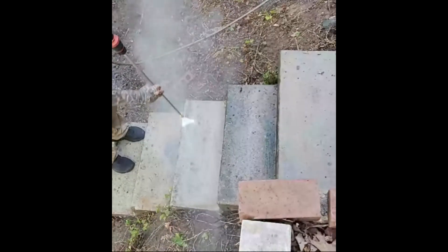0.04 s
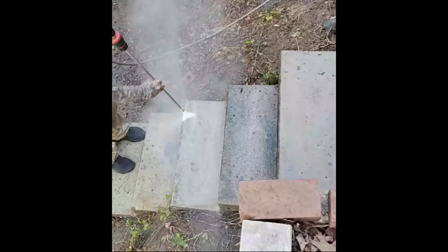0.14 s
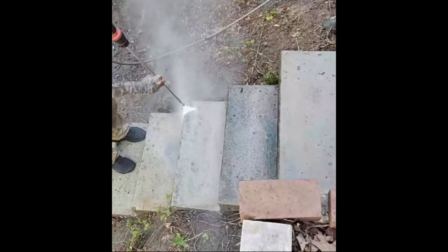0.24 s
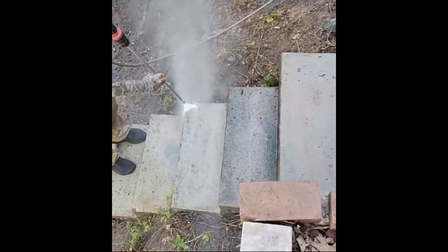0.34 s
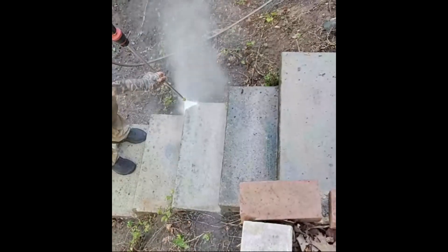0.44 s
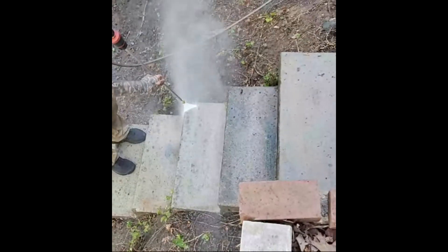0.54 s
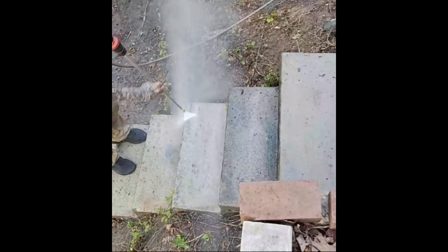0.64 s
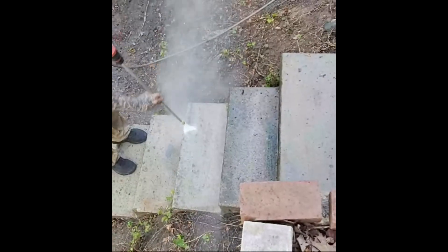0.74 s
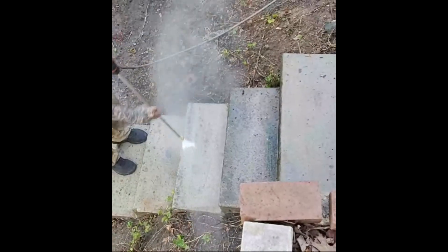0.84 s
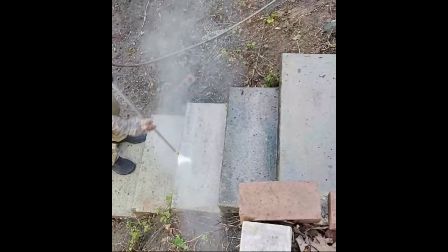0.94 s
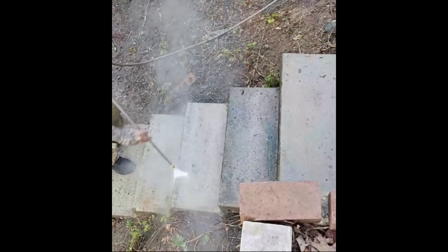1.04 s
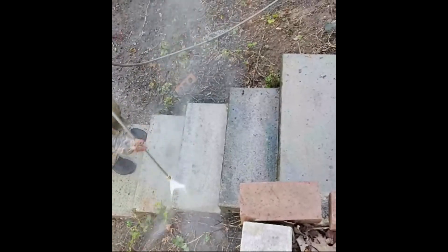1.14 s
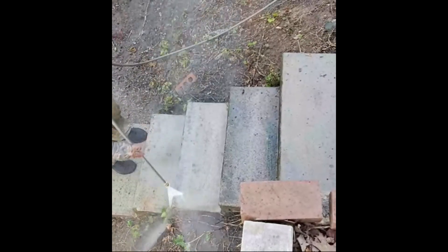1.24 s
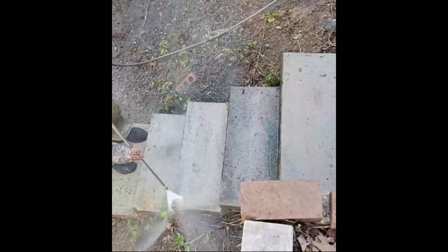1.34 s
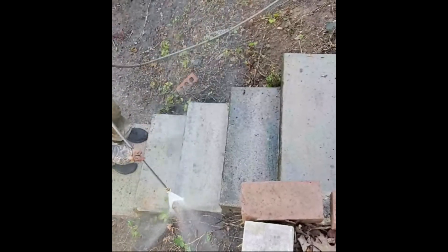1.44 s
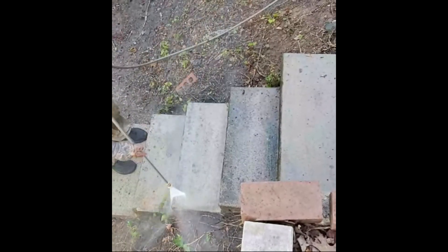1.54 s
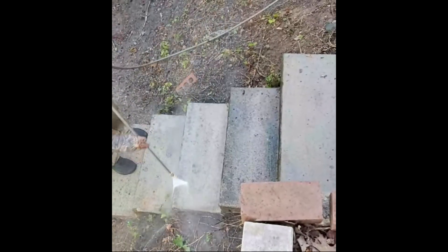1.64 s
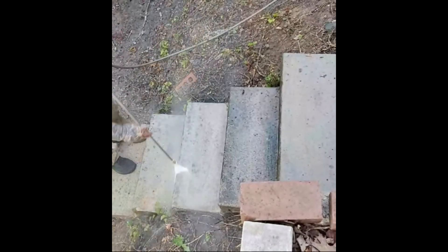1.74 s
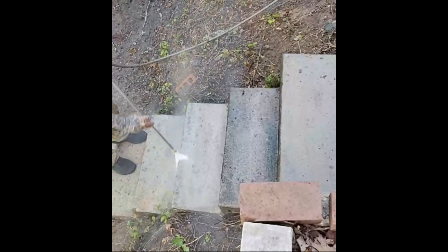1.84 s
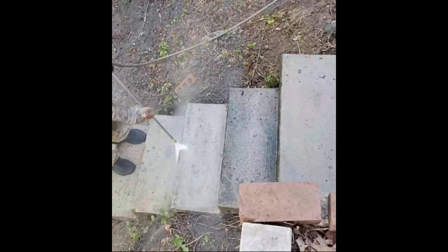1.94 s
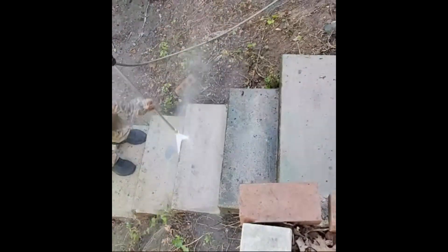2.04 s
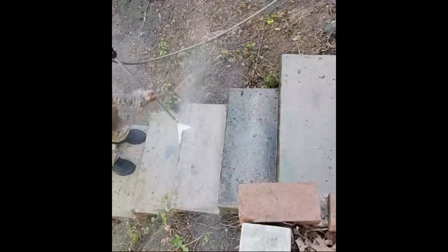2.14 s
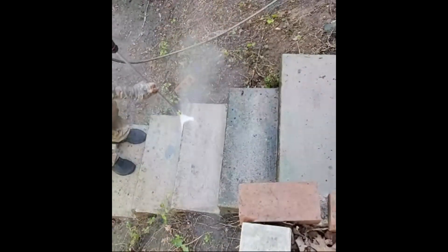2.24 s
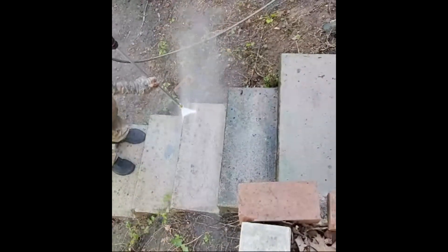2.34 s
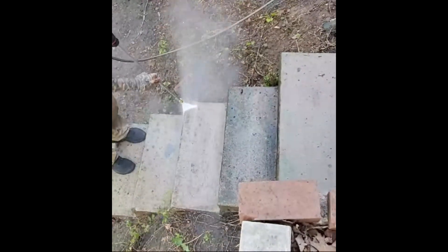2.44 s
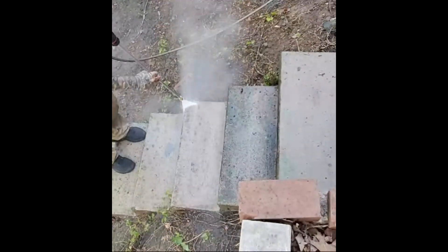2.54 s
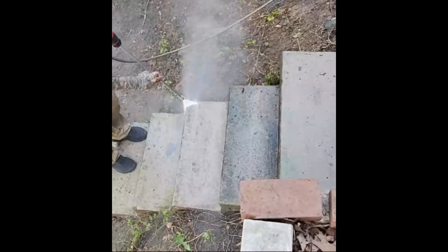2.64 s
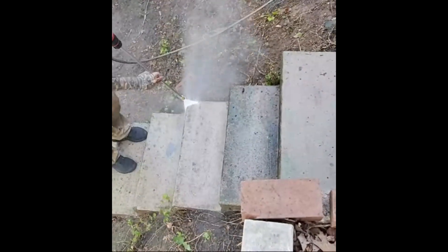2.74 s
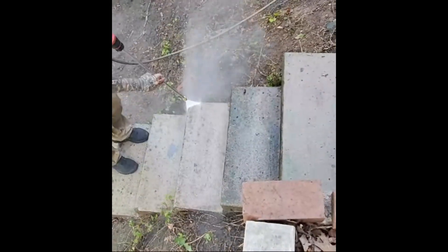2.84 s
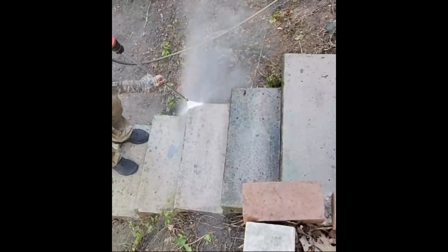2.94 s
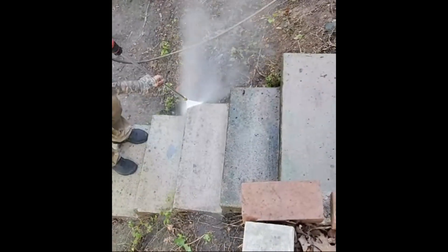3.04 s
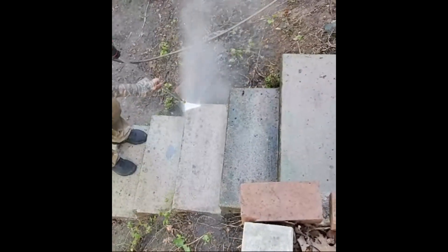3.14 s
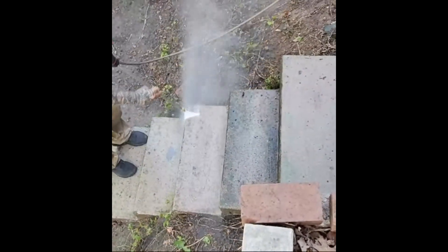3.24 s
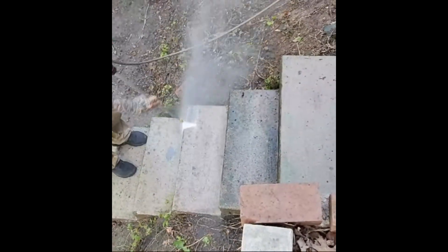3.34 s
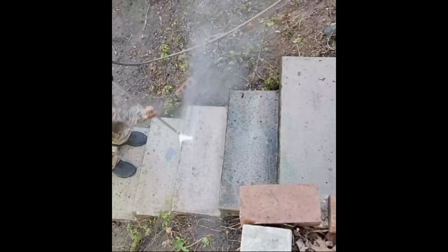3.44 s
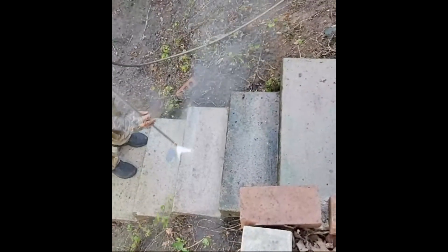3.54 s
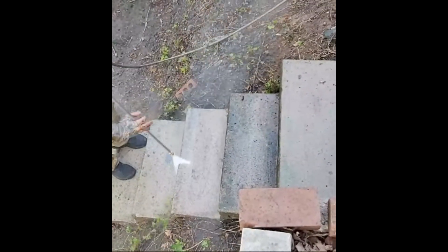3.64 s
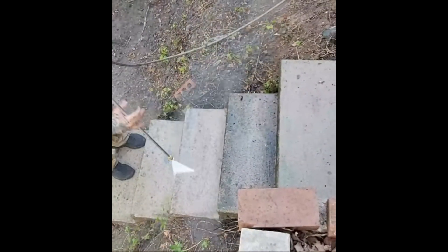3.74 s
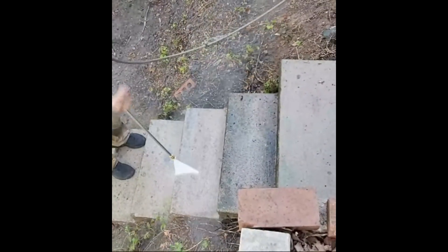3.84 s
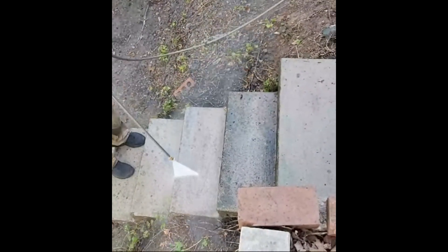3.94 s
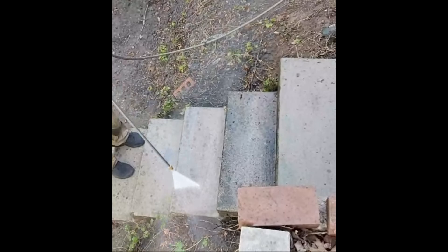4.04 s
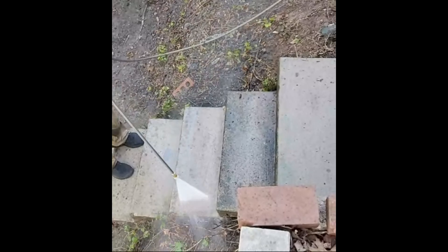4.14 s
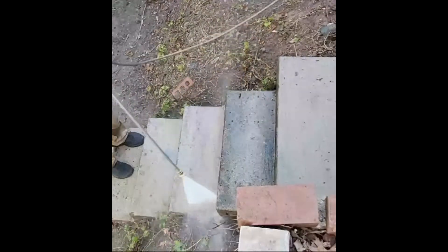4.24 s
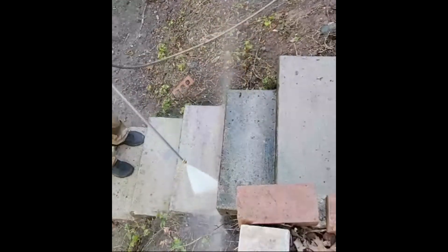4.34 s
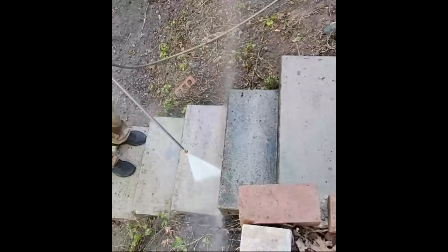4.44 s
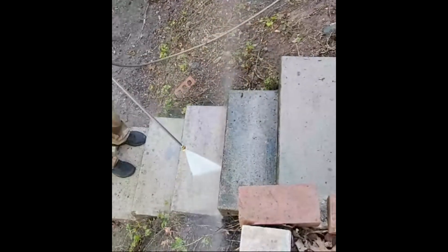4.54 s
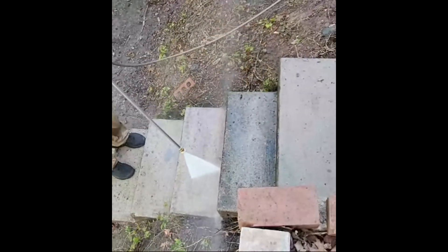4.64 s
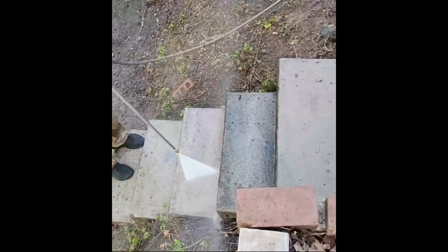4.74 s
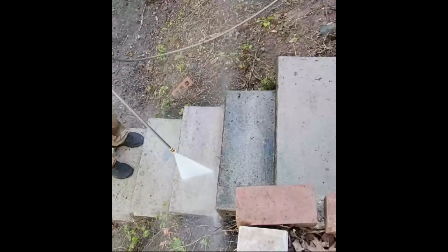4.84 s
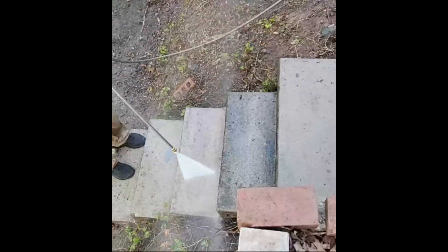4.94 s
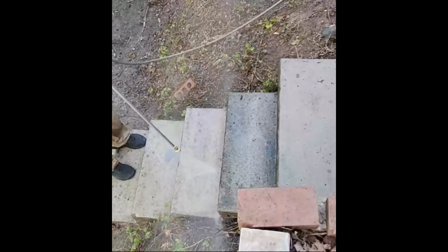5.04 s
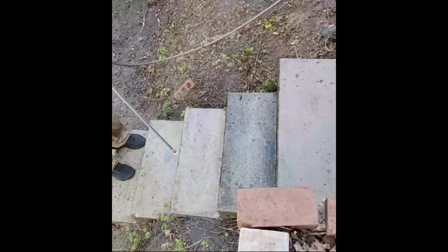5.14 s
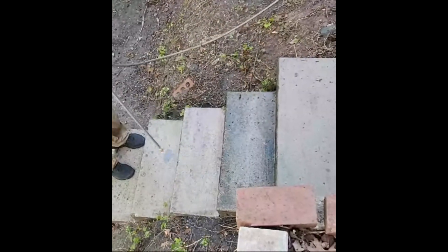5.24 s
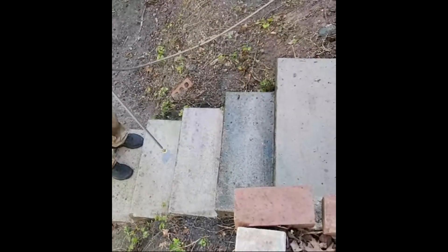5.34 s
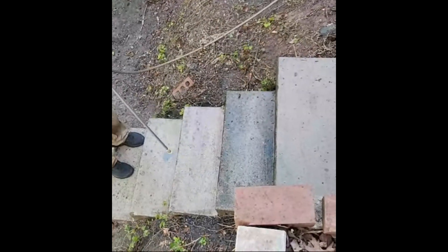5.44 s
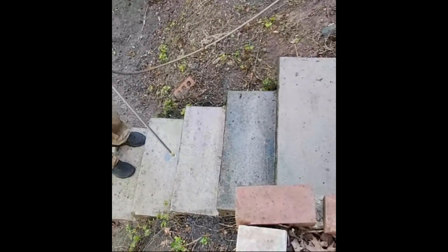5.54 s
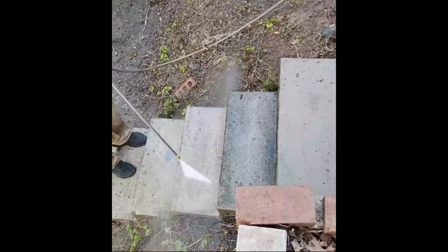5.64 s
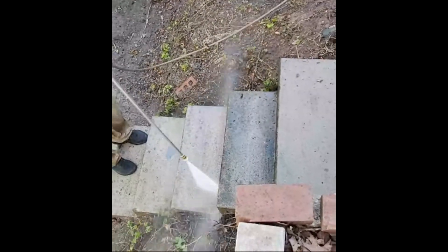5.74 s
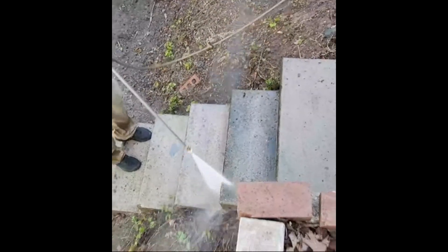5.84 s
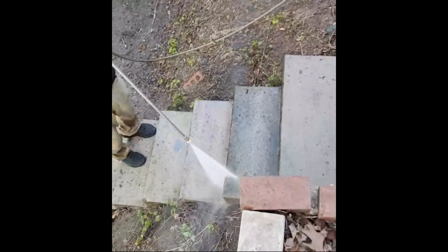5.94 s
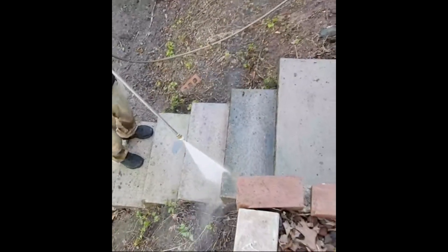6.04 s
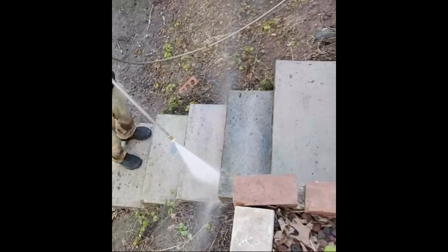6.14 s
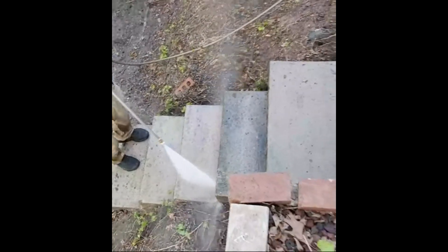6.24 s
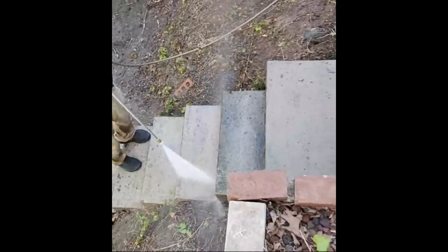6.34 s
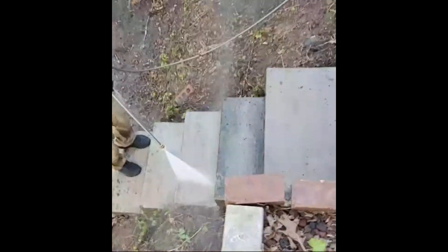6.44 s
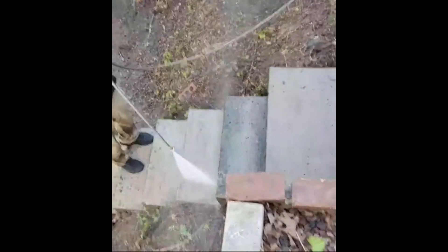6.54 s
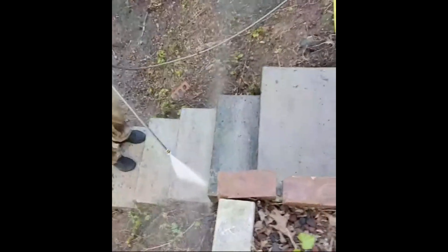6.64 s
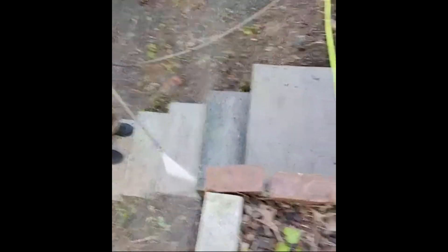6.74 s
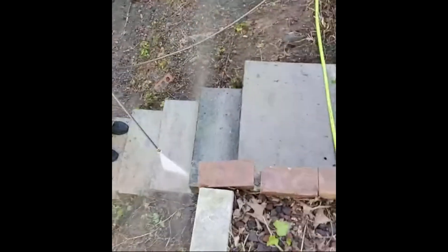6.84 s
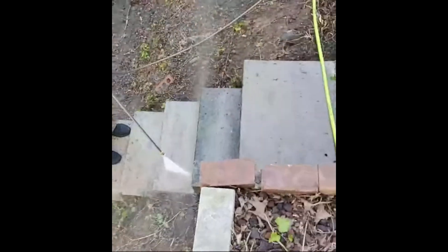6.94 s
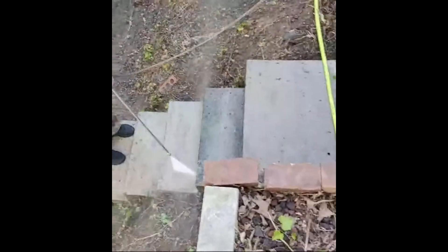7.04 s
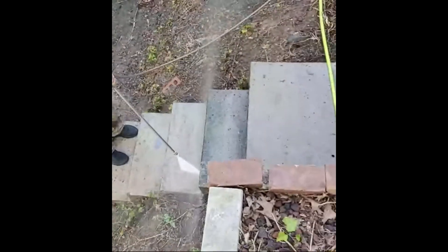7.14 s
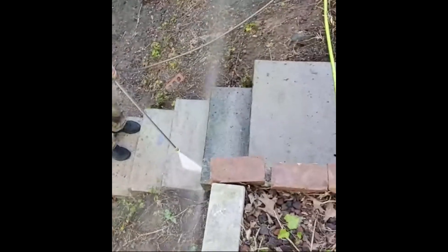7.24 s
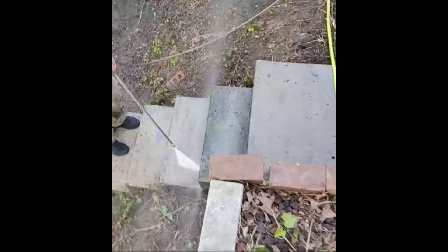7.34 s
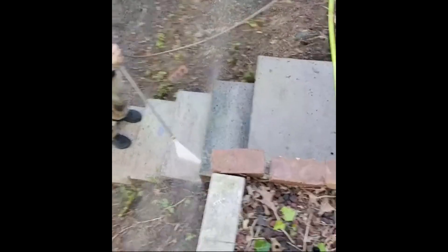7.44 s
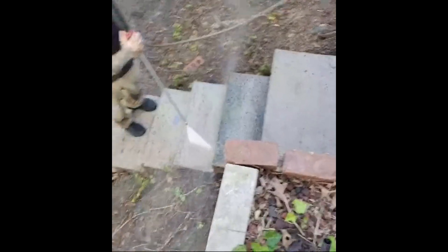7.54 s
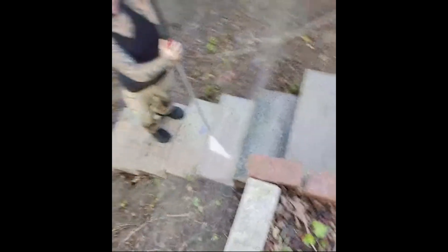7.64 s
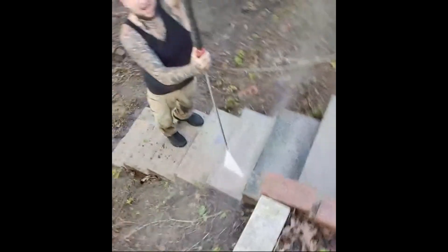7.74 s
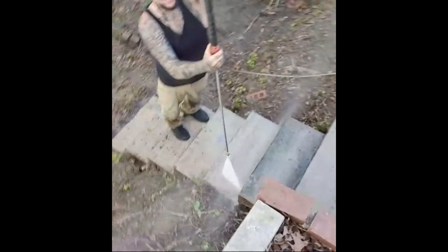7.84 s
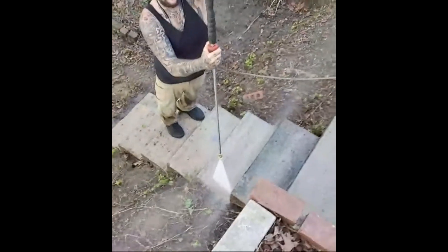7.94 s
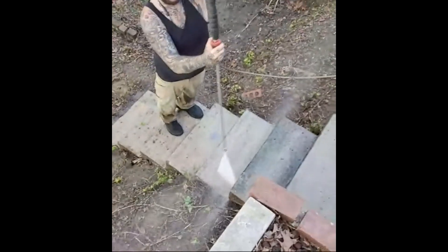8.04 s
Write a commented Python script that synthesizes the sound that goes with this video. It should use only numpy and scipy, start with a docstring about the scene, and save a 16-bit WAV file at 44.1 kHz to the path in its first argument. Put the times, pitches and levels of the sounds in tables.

```python
"""A pressure washer's jet sweeps concrete steps, hissing steadily and flaring on edges and corners.
Its one-cylinder petrol engine drones and clatters some way off. The trigger is let go for half a
second: the hiss drops and the unloaded engine races. Then the jet slams back into the corner of a
step, where the water slaps, gushes and churns. Thin high bands of noise flicker in this loud passage,
and a rough low hum sounds under the jet at first and later around the engine's drone."""
import sys
import numpy as np
from scipy import signal
from scipy.fft import rfft, irfft, next_fast_len
from scipy.io import wavfile
from scipy.ndimage import uniform_filter1d, map_coordinates

SR = 44100
rng = np.random.default_rng(int(sys.argv[2]) if len(sys.argv) > 2 else 0)


def to_wav(sig):
    """Store sig (one row per channel, or 1-D mono) as 16-bit WAV at the path in sys.argv[1].

    Samples outside -1..1 are clipped; the rate is SR.
    """
    pcm = np.clip(np.atleast_2d(sig), -1, 1) * 32767
    pcm = np.round(pcm).astype(np.int16)
    wavfile.write(sys.argv[1], SR, pcm.T)  # frames by channels


N = 356328
TIME_S = np.arange(N) / SR
TRIGGER_OFF_S, TRIGGER_ON_S, LOUD_ENDS_S = 5.06, 5.587, 6.74


def amp(db):
    return 10 ** (np.asarray(db) / 20)

def unit(x):
    return x / np.sqrt(np.mean(x ** 2) + 1e-20)

def mix_db(*levels_db):
    """Levels added as powers."""
    return 10 * np.log10(sum(amp(db) ** 2 for db in levels_db))

def eq(points, hz):
    """Gain of an EQ curve drawn through (freq_hz, gain_db) points on a log axis."""
    freq_hz, gain_db = np.transpose(points)
    return amp(np.interp(np.log(hz + 1), np.log(freq_hz + 1), gain_db))

def hump(hz, centre_hz, octaves, steep):
    """A band that falls to 1/e at `octaves` either side of its centre."""
    return np.exp(-np.abs(np.log2((hz + 1) / centre_hz) / np.clip(octaves, .008, 3)) ** steep)

def curves(rows):
    """Automation: one value per sample for each column after the time."""
    time_s, *columns = np.transpose(rows)
    return [np.interp(TIME_S, time_s, column) for column in columns]

def bursts(tables, edge_s=0.022):
    """Joins tables into one automation, faded to silence between them."""
    rows = []
    for table in tables:
        first, last = table[0], table[-1]
        rows += [(first[0] - edge_s, -100, *first[2:]), *table, (last[0] + edge_s, -100, *last[2:])]
    return curves(rows)

def swell(peak_s, length_ms):
    """A bell-shaped rise and fall."""
    return np.exp(-(2000 * (TIME_S - peak_s) / length_ms) ** 2)

def wobble(rate):
    """A smooth random curve, `rate` knots a second."""
    return map_coordinates(rng.standard_normal(int(N * rate / SR) + 4), [np.arange(N) * rate / SR])

def filtered(x, response):
    """x through a filter with gain response(hz)."""
    size = next_fast_len(N + 8192)
    return irfft(rfft(x, size) * response(np.fft.rfftfreq(size, 1 / SR)), size)[:N]

def rush(shape, patchy_db, grain_db, grain_rate):
    """Noise of rms 1, coloured by shape(hz, sample index), with random patches and a fast grain."""
    grain = amp(grain_db * wobble(grain_rate))
    hz, frame_s, spectra = signal.stft(grain * rng.standard_normal(N), SR, nperseg=512)
    field = uniform_filter1d(rng.standard_normal(spectra.shape), size=5, axis=0)
    field = unit(uniform_filter1d(field, size=7, axis=1))
    at = np.minimum(frame_s * SR, N - 1).astype(int)
    colour = shape(hz[:, None], at) * np.ones(spectra.shape)
    colour /= np.sqrt(np.mean(colour ** 2, axis=0))
    patches = amp((patchy_db * np.ones(N))[at] * field)
    return unit(signal.istft(spectra * colour * patches, SR, nperseg=512)[1][:N])


def firing_rate(free_s, loaded_s, unloaded):
    """Firings a second: the engine races and settles off load, then bogs briefly as the load returns."""
    governed_hz, race_hz, bog_hz = 28.36, 3.6, .9
    run_up_s, settle_hz_per_s, recover_s = .15, 8.5, .25
    race = race_hz * np.sin(np.pi / 2 * np.minimum(free_s / run_up_s, 1)) ** 2
    settle = settle_hz_per_s * np.clip(free_s - run_up_s, 0, 1)
    bog = bog_hz * np.exp(-loaded_s / recover_s)
    return governed_hz + unloaded * (race - settle) - (1 - unloaded) * bog

# Engine fader, with a lift of the orders near 388 Hz: time_s, level_db, lift_db
ENGINE_FADER = [(0, -44, -9), (3.3, -42, -9.5), (5.1, -43.5, -2), (5.56, -44.5, -1.5), (5.7, -56, 5),
                (6.2, -54, 3), (6.8, -50.5, 9.5), (7.4, -50.5, 11), (8.08, -48.5, 8.5)]
# Exhaust harmonics: multiple_of_firing_rate, level_db
EXHAUST_ORDERS = [(1, -35), (2, -20.5), (3, -22), (4, -10.5), (5, -3), (6, -6), (7, 4), (8, 3.5), (9, -4),
                  (10, -11.5), (11, -7), (12, 1.5), (13, -9), (14, -29.5), (15, -31.5), (16, -5.5),
                  (17, -13.5), (18, -17.5), (19, -6.5), (20, -6.5), (21, -12.5)]
# Tone of the casing's clatter: freq_hz, gain_db
CLATTER_EQ = [(15, -52.5), (25, -30), (91, -19.5), (120, -9.5), (223, -12.5), (279, -14), (308, -12),
              (493, -28), (617, -16), (811, -26.5), (2610, -37), (8390, -51.5), (9500, -54.5),
              (12400, -93.5), (20900, -120)]

def engine():
    """One cylinder's wavering exhaust orders over clatter; unloaded, it swells and thins out."""
    lag_s, thins_s, lift_hz = .08, .25, 388
    free_s = np.clip(TIME_S - TRIGGER_OFF_S - lag_s, 0, None)
    loaded_s = np.clip(TIME_S - TRIGGER_ON_S, 0, None)
    unloaded = np.exp(-(loaded_s / .05) ** 2)  # falls to 0 as the load returns
    rate = firing_rate(free_s, loaded_s, unloaded)
    free = unloaded * np.tanh(free_s / thins_s)
    level_db, lift_db = curves(ENGINE_FADER)
    slope_db = -1.5 - 13 * free  # per octave either side of the fourth order
    hunting_hz = 0.049 + 0.18 * np.abs(rate - rate[0])  # uneven off its governed speed
    phase = 2 * np.pi * np.cumsum(rate + hunting_hz * wobble(10)) / SR
    exhaust = np.zeros(N)
    for order, db in EXHAUST_ORDERS:
        colour_db = slope_db * abs(np.log2(order / 4)) + lift_db * hump(order * rate[0], lift_hz, .13, 2)
        smear = np.pi / 4 * order ** 2  # the silencer smears each firing into four even puffs
        exhaust += amp(db + colour_db + 0.91 * wobble(5)) * np.sin(order * phase - smear)
    clatter = rush(lambda hz, i: eq(CLATTER_EQ, hz), patchy_db=-1.5, grain_db=-1.0, grain_rate=120)
    clatter_db = -8 + 0.44 * slope_db - 0.16 * lift_db
    return amp(level_db + 6 * free) * (unit(exhaust) + amp(clatter_db) * clatter)


def loud_passage():
    """1 during the loud passage after the jet restarts, otherwise 0."""
    return 1. * (TIME_S > TRIGGER_ON_S) * (TIME_S < LOUD_ENDS_S)

def trigger_db():
    """The valve shuts and ducks the hiss to a fading drip."""
    travel_s, drip_db, fade_db_per_s = 0.042, -13, -8
    closing = np.clip((TIME_S - TRIGGER_OFF_S) / travel_s + .5, 0, 1)
    opening = np.clip((TRIGGER_ON_S - TIME_S) / travel_s + .5, 0, 1)
    return closing * opening * (drip_db + fade_db_per_s * (TIME_S - TRIGGER_OFF_S))

# Sputters in the fan of water: centre_s, depth_db, length_ms
FAN_SPUTTERS = [(4.2, -5, 60), (4.936, -5.5, 33), (5.632, 0, 16), (5.8, -2.5, 27), (5.86, -3.5, 19),
                (5.93, -3.5, 23), (5.77, -2.5, 23), (6.03, -18, 46), (6.16, -5, 32), (6.215, -3.5, 24),
                (6.279, -16.5, 39), (6.385, -8, 38), (6.505, -10, 61), (6.775, -3.5, 50), (7.36, -4, 43)]

def breakup_db():
    """The level dips as the fan breaks up for an instant; each layer scales the dips to suit."""
    return sum(db * swell(s, ms) for s, db, ms in FAN_SPUTTERS)


# Thin high bands of noise: centre_hz, half_width_oct, level_db
HIGH_BANDS = [(6550, .06, -44), (8600, 0.01, -50.5)]

def high_bands():
    """Thin, flickering high bands of noise in the loud passage."""
    out = np.zeros(N)
    for centre_hz, octaves, db in HIGH_BANDS:
        flicker = amp(db - 5.7 * np.abs(wobble(14)))
        band = rush(lambda hz, i: hump(hz, centre_hz, octaves, 2),
                    patchy_db=.8, grain_db=1.0, grain_rate=100)
        out += flicker * band
    return loud_passage() * amp(.3 * breakup_db()) * out


# Stretches of rough low hum: start_s, length_s, level_db, level_change_db, pitch_hz
LOW_HUMS = [(5.844, 0.31, -32.5, -2, 352), (6.239, .46, -35.5, -3, 352), (6.763, 0.036, -41, -1, 459),
            (7.0, 1.04, -55, 9.5, 375)]

def low_hum():
    """A rough low hum, under the jet at first and later around the engine's drone."""
    ramp_s = .04
    notes = [[(s - ramp_s, db - 20, hz), (s, db, hz),
              (s + length, db + change, hz), (s + length + ramp_s, db + change - 20, hz)]
             for s, length, db, change, hz in LOW_HUMS]
    level_db, pitch_hz = bursts(notes, edge_s=.002)
    phase = 2 * np.pi * np.cumsum(pitch_hz) / SR
    tone = unit((0.6 + wobble(90)) * np.cos(phase) + wobble(90) * np.sin(phase))
    return amp(level_db + .3 * breakup_db()) * tone


# Colour of the corner, on churn and gushes alike: freq_hz, gain_db
CORNER_EQ = [(200, -4), (400, 0), (570, 2), (800, -4.5), (1100, -1), (1600, -1), (2500, 8)]
# Fader of the churning water: time_s, level_db
CHURN_FADER = [(5.59, -20.5), (5.665, -38), (5.72, -20.5), (5.9, -25), (6.0, -29), (6.2, -36),
               (6.38, -33.5), (6.452, -29.5), (6.5, -33), (6.8, -55), (7.3, -57), (8.08, -50)]

def churn():
    """Thrown-back water churns in the angle of the step."""
    backsplash_db = bursts(FLARE_PASSES)[0] - 23  # every flare throws back a little water
    level_db = mix_db(bursts([CHURN_FADER])[0], backsplash_db)
    water = rush(lambda hz, i: hump(hz, 888, 1.0, 1.95) * eq(CORNER_EQ, hz),
                 patchy_db=3.0, grain_db=1.5, grain_rate=140)
    return amp(level_db + 0.13 * breakup_db() + 0.51 * wobble(30)) * water


# Gushes and splashes: peak_s, level_db, centre_hz, half_width_oct, length_ms
GUSH_CUES = [(0.861, -29, 2950, 0.059, 170), (.92, -31.5, 3960, 0.06, 220), (1.03, -36, 5360, 0.052, 110),
             (1.115, -24.5, 1290, .9, 105), (1.455, -30, 1560, 0.74, 53), (1.798, -24, 2580, 0.089, 37),
             (3.362, -31, 2370, 0.26, 50), (4.152, -33, 1190, 0.88, 59), (5.594, -20.5, 890, 0.38, 9.6),
             (5.612, -18.5, 760, 0.52, 16), (5.635, -29, 704, .5, 13), (5.697, -17.5, 990, 0.7, 27),
             (5.715, -20, 730, 0.76, 18), (5.737, -14.5, 740, 0.93, 20), (5.762, -28, 560, 0.38, 12),
             (5.795, -19.5, 760, 1.1, 16), (5.815, -32.5, 220, 0.55, 42), (5.835, -31, 650, 0.82, 22),
             (5.885, -20, 520, 0.49, 59), (5.94, -33, 1000, 0.38, 24), (6.0, -32, 850, 1.1, 25),
             (6.08, -24.5, 1000, 0.73, 32), (6.14, -40, 250, 0.25, 57), (6.19, -32, 3160, 0.11, 45),
             (6.33, -32, 3100, .2, 33), (6.865, -41, 460, 0.11, 40), (7.04, -36, 1560, 0.52, 38),
             (7.28, -37.5, 1490, 0.43, 40), (7.865, -36, 3000, 0.24, 41), (8.08, -35, 2910, 0.29, 38)]

def gushes():
    """The jet catches an edge or digs into the corner: short swells of noise, each in its own band."""
    out, span = np.zeros(N + SR), SR // 2
    t = (np.arange(span) - span // 2) / SR
    hz = np.fft.rfftfreq(span, 1 / SR)
    for peak_s, db, centre_hz, octaves, ms in GUSH_CUES:
        colour = hump(hz, centre_hz, octaves, 1.55) * eq(CORNER_EQ, hz)
        noise = unit(irfft(rfft(rng.standard_normal(span)) * colour, span))
        envelope = amp(db) * np.exp(-(2000 * t / ms) ** 2)
        out[round(peak_s * SR) - span // 2:][:span] += envelope * noise
    return out[:N]


# First slugs of water as the valve reopens: start_s, level_db, decay_ms
SLAP_HITS = [(5.592, -3.5, 34), (5.605, 6.5, 39)]
# Tone of a slap on concrete: freq_hz, gain_db
SLAP_EQ = [(88, -67), (150, -34), (296, -31), (696, -12), (1330, -7), (2490, -1.5), (3780, -4), (4830, -22),
           (7210, -20), (9700, -49), (12600, -79), (21300, -120)]

def slaps():
    """Slugs of water land as noise bursts with a fast attack."""
    attack_s, trim_db = 0.0016, -8
    envelope = np.zeros(N)
    for start_s, db, decay_ms in SLAP_HITS:
        age_s = np.clip(TIME_S - start_s, 0, None)
        decay = amp(db + trim_db - 60 * age_s / (decay_ms / 1000))
        envelope += decay * (1 - np.exp(-age_s / attack_s))
    return envelope * unit(filtered(rng.standard_normal(N), lambda hz: eq(SLAP_EQ, hz)))


# Fader of the fan of water: time_s, level_db
SPRAY_FADER = [(0, -37), (.6, -38), (1.5, -35.5), (2.7, -38), (4.2, -33.5), (5.06, -35.5), (5.6, -35.5),
               (6.3, -38.5), (6.65, -31.5), (6.78, -44), (7.4, -41), (8.08, -42)]
# Body of the steady hiss: freq_hz, gain_db
HISS_EQ = [(180, -37.5), (300, 3.5), (348, -7), (368, -16), (582, -0.5), (723, -10), (1070, -4),
           (1550, -4.5), (2450, -1), (4060, -6), (4600, -13.5), (5980, -52), (10100, -120)]
# Showers of fine droplets: peak_s, level_db, length_ms
DROPLET_SHOWERS = [(.985, -31.5, 140), (1.74, -49.5, 490), (3.64, -29.5, 140), (3.81, -31.5, 250),
                   (5.611, -34, 32), (5.7, -35, 120), (5.96, -50, 62), (6.14, -43, 30), (6.56, -40.5, 390)]
# Fader of the sheen, the highest hiss: time_s, level_db
SHEEN_FADER = [(0, -49.5), (1.3, -50.5), (1.76, -46.5), (2.4, -51.5), (3.5, -48.5), (5.06, -47),
               (5.6, -42.5), (6.64, -47.5), (6.8, -56.5), (7.6, -52), (8.08, -56)]
# Tone of the sheen: freq_hz, gain_db
SHEEN_EQ = [(5200, -20), (6100, -2.5), (7200, 0.5), (7800, -1.5), (8100, -20), (8170, 3.5), (8350, -1.5),
            (8750, -6.5), (8870, -21), (9580, -15), (9700, -48), (10000, -120)]

def spray():
    """The fan of water hisses on the slab; finer droplets sizzle and shimmer above it."""
    hiss = rush(lambda hz, i: eq(HISS_EQ, hz) / (1 + (hz / 4500) ** 12),
                patchy_db=1.65, grain_db=1.26, grain_rate=260)
    sizzle = rush(lambda hz, i: hump(hz, 4975, 0.26, 4.9), patchy_db=2.4, grain_db=1.0, grain_rate=340)
    sheen = rush(lambda hz, i: eq(SHEEN_EQ, hz), patchy_db=1.85, grain_db=1.14, grain_rate=150)
    level_db = curves(SPRAY_FADER)[0] + trigger_db()
    sheen_db = curves(SHEEN_FADER)[0] + 1.19 * trigger_db()
    dips_db = breakup_db()
    showers = sum(amp(db) * swell(s, ms) for s, db, ms in DROPLET_SHOWERS)
    sizzle_gain = np.hypot(amp(level_db - 17 + .6 * dips_db - 3 * loud_passage()), showers)
    sheen_gain = np.hypot(amp(sheen_db), amp(-15) * showers)
    shimmer = amp(0.33 * dips_db + 0.55 * wobble(16))
    return amp(level_db + dips_db) * hiss + sizzle_gain * sizzle + sheen_gain * shimmer * sheen


# Steady peaks that colour every flare: centre_hz, half_width_oct, added_gain
FLARE_PEAKS = [(2960, 0.049, 0.27), (4050, 0.017, 0.93)]
# Passes of the jet over edges and corners, one list each: time_s, level_db, centre_hz
FLARE_PASSES = [
    [(.7, -45.5, 2610), (.81, -32.5, 2760), (.984, -18, 2920), (1.1, -19, 2600), (1.18, -21.5, 2430),
     (1.23, -27, 2750), (1.3, -37, 2500)],
    [(1.7, -41, 2780), (1.81, -28, 2700), (1.88, -21, 3050), (1.95, -24, 2950), (2.08, -40, 2780)],
    [(3.4, -43.5, 2700), (3.474, -27, 3090), (3.69, -18, 2560), (3.77, -19.5, 2810), (4.1, -19.5, 2750),
     (4.24, -24.5, 2480), (4.54, -21.5, 2910), (4.9, -25, 2760), (5.06, -32.5, 2810)],
    [(5.6, -17.5, 2740), (5.92, -31, 2560), (5.99, -23, 2440), (6.07, -24, 2510), (6.25, -31, 2960),
     (6.32, -26.5, 2770), (6.46, -22, 2580), (6.55, -24.5, 3010), (6.62, -27.5, 2480), (6.74, -23.5, 2870),
     (6.98, -29.5, 3040), (7.32, -35, 2750), (7.48, -39.5, 3070), (7.84, -49.5, 3020)],
]

def flares():
    """The jet tears across an edge: a rough band that moves with its angle, under a steep high cut."""
    drawn_back_s, high_cut_hz = (6.81, 7.06), 4146
    level_db, centre_hz = bursts(FLARE_PASSES)
    # Louder and lower flares are wider; drawing the lance back narrows them.
    octaves = np.clip(0.44 + 0.03 * (level_db + 24) + .6 * np.log2(2900 / centre_hz), .15, 1)
    octaves = np.maximum(octaves * np.interp(TIME_S, drawn_back_s, [1, 0.54]), .2)

    def colour(hz, i):
        peaks = 1 + sum(gain * hump(hz, peak_hz, width, 2.2) for peak_hz, width, gain in FLARE_PEAKS)
        return hump(hz, centre_hz[i], octaves[i], 1.52) * peaks / (1 + (hz / high_cut_hz) ** 24)

    gurgle_db = 1.1 * loud_passage()  # patchier in the corner
    tear = rush(colour, patchy_db=1.5 + gurgle_db, grain_db=2.0, grain_rate=260)
    return amp(level_db + 1.24 * breakup_db() + 0.7 * wobble(30)) * tear


def scene():
    """All layers, in mono."""
    return (engine() + spray() + high_bands() + flares() + churn() + low_hum() + gushes() + slaps())[None]


# Tone of the overload fizz: freq_hz, gain_db
FIZZ_EQ = [(9600, -120), (10200, -33), (11800, -19.5), (12100, -0.5), (14000, -4.5), (16000, -5.5)]

def record(dry):
    """The microphone path rounds off peaks and cuts both ends; a faint fizz rides on loud passages."""
    ceiling, low_cut_hz, high_cut_hz, band_limit_hz = .8, 45, 9620, 15800
    rounded = dry[0] / (1 + np.abs(dry[0] / ceiling) ** 4) ** (1 / 4)
    heard = filtered(rounded, lambda hz: 1 / (1 + (hz / high_cut_hz) ** 150))
    heard = filtered(heard, lambda hz: hz ** 2 / (hz ** 2 + low_cut_hz ** 2))
    treble = filtered(heard, lambda hz: hz > 1500)
    treble_rms = np.sqrt(np.abs(uniform_filter1d(treble ** 2, size=300)))
    fizz = unit(filtered(rng.standard_normal(N), lambda hz: eq(FIZZ_EQ, hz)))
    fizz_gain = amp(-50.5) * treble_rms * (1 + (treble_rms / 0.15) ** 2)
    return filtered(heard + fizz_gain * fizz, lambda hz: hz < band_limit_hz)[None]


dry = scene()
out = record(dry)
to_wav(out)
```